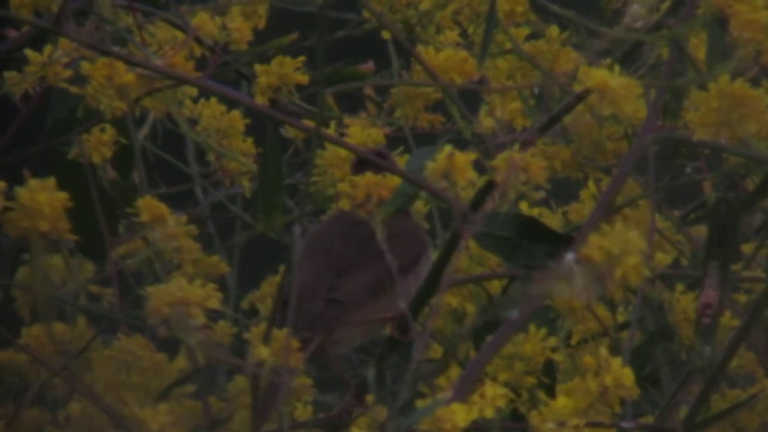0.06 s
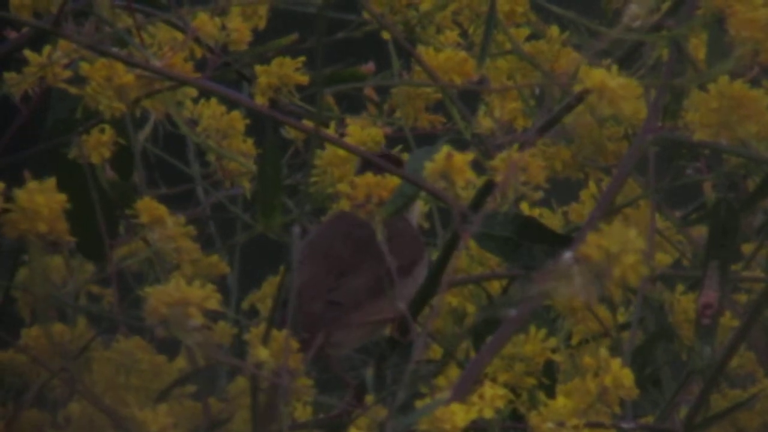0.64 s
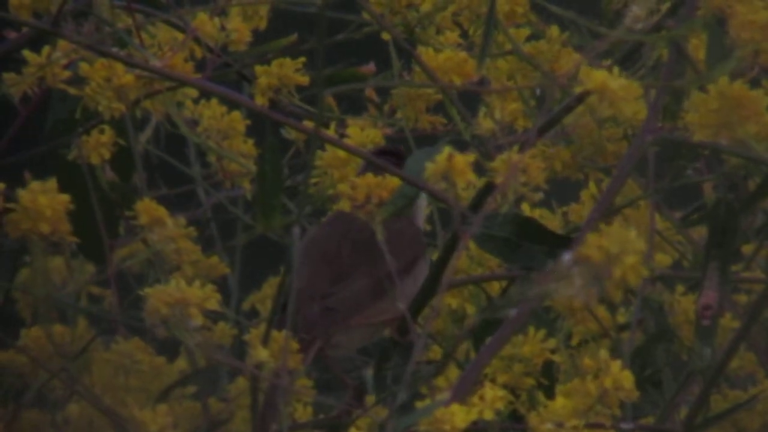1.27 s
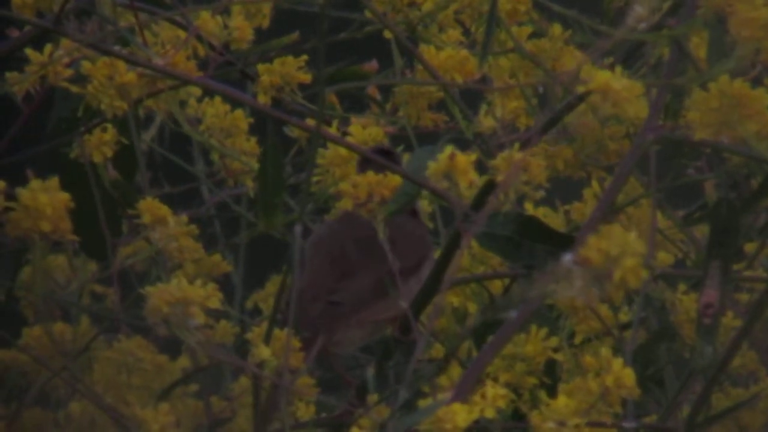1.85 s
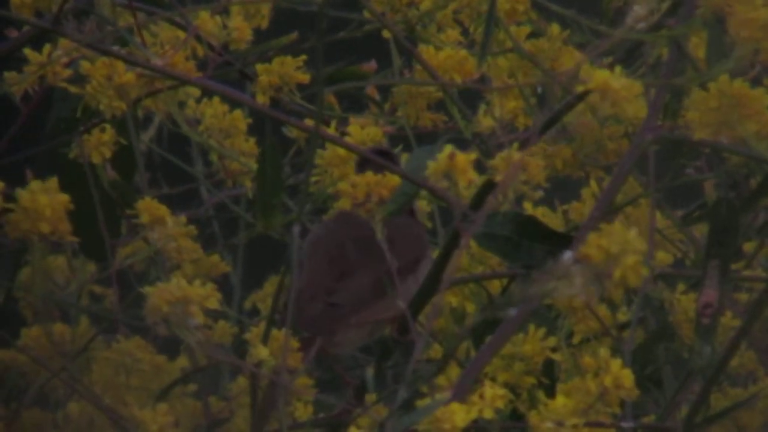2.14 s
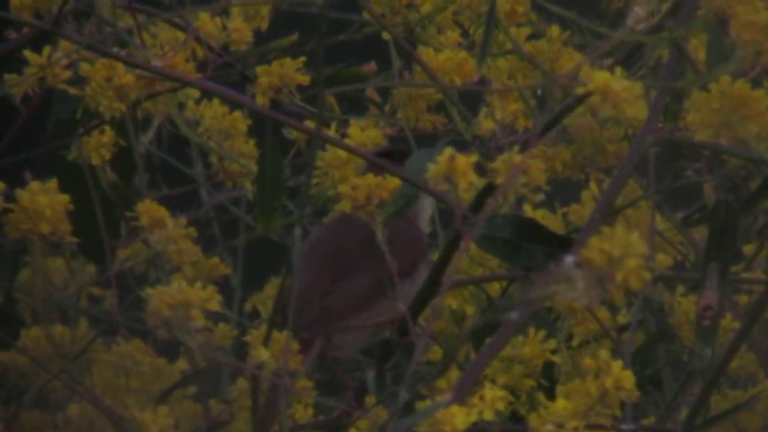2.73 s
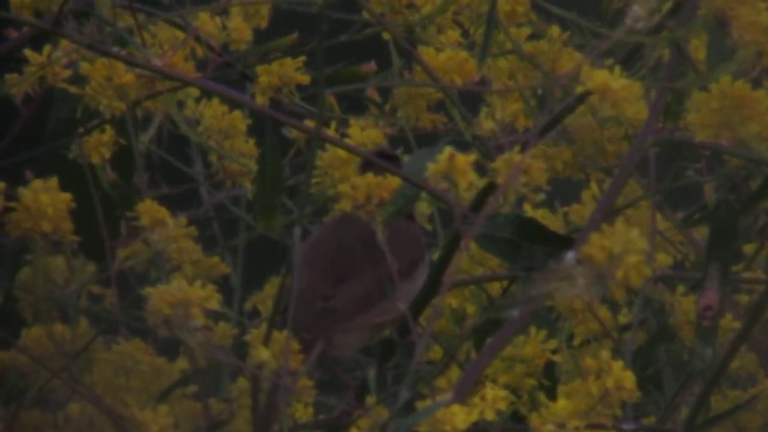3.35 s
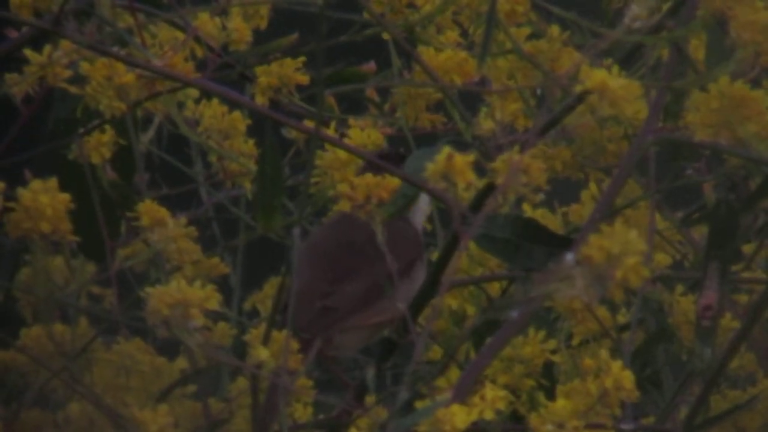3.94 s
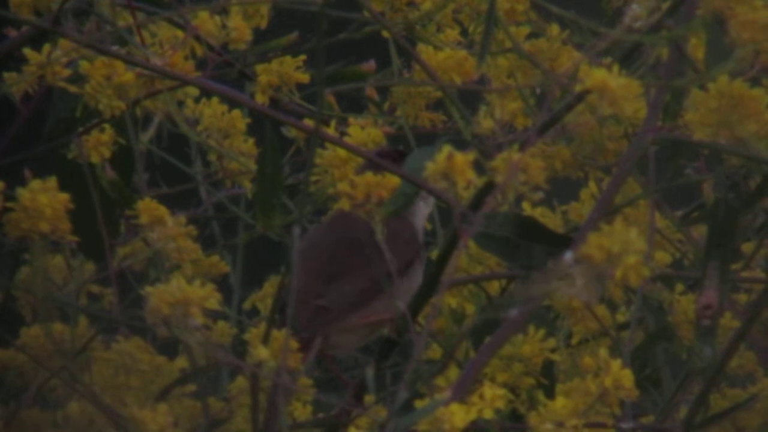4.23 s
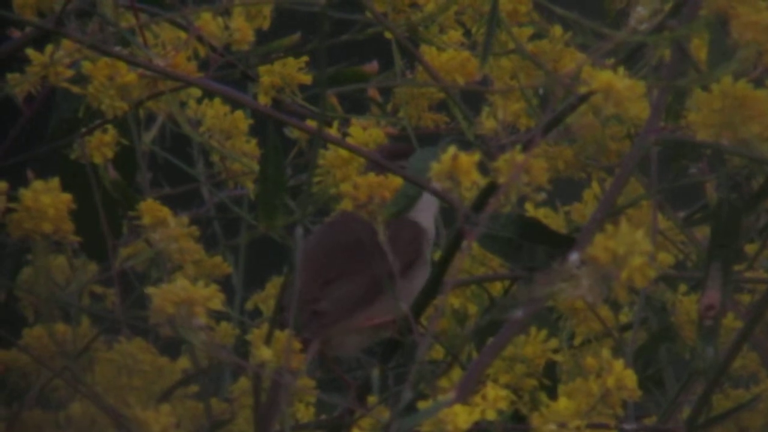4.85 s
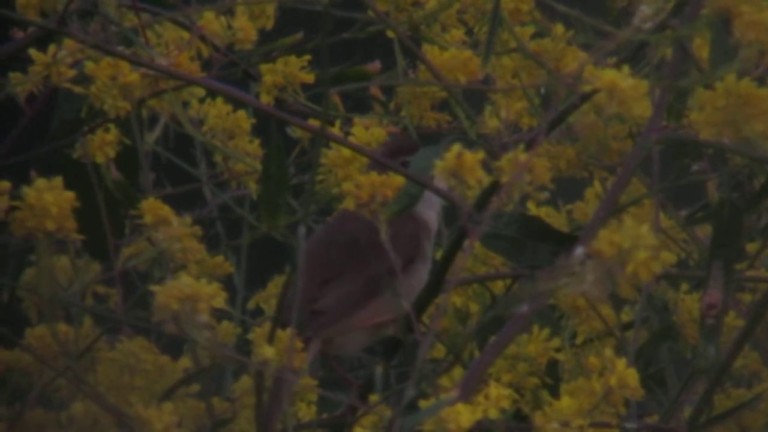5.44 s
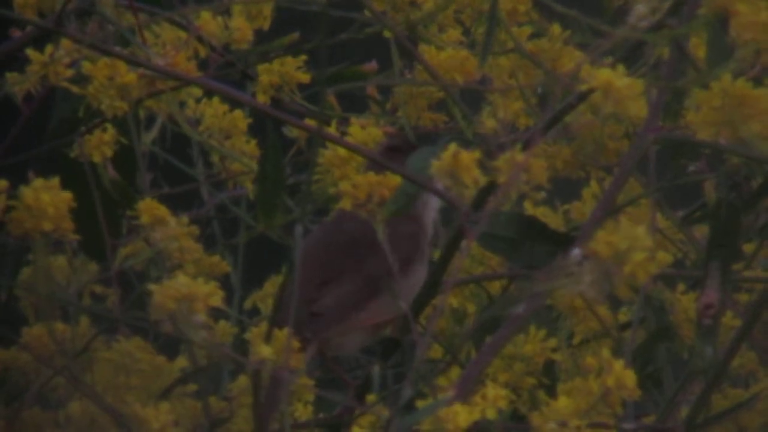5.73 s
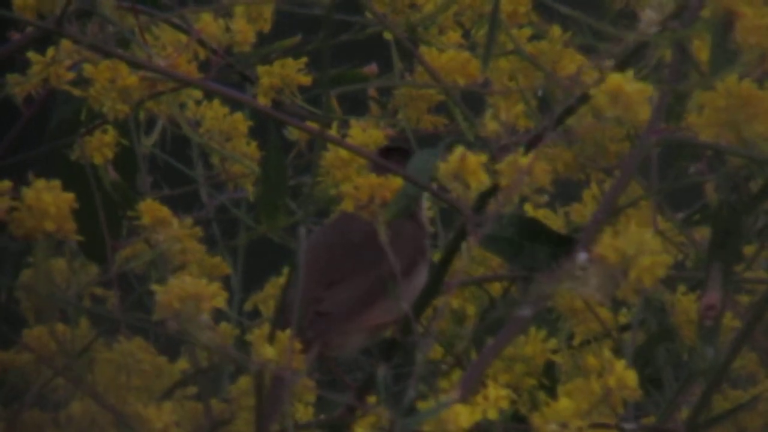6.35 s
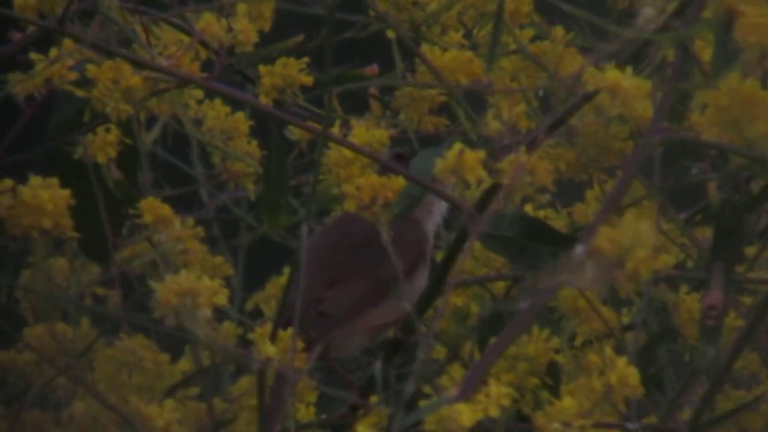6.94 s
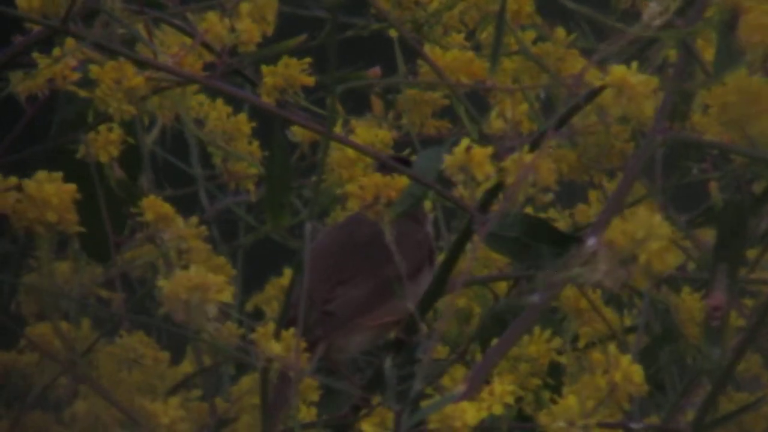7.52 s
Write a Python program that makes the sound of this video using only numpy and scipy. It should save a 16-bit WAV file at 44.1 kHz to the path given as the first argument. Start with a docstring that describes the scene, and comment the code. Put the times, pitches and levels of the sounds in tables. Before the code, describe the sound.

A small warbler sings buzzes, chips and rising whistles outdoors while gusts of wind rumble and thump on the microphone.

```python
"""Warbler in a windy bush

A warbler repeats a phrase of modulated tones: buzz, rising whistle, nasal notes, a chip and quick slurs.
Twigs and ground scatter the song. Turbulent gusts buffet the two microphone ports in turn, and the
leaves rustle once. Behind lie a faint outdoor hush, a distant roar, an insect and the hiss and thin
whine of the camera."""
import sys
import numpy as np
from scipy import signal
from scipy.fft import rfft, irfft, next_fast_len
from scipy.io import wavfile
from scipy.ndimage import map_coordinates

SR = 44100
rng = np.random.default_rng(int(sys.argv[2]) if len(sys.argv) > 2 else 0)


def bounce(signal):
    """Save signal as a 16-bit WAV file at the path given by the first command-line argument."""
    frames = np.transpose(np.atleast_2d(signal))
    limited = np.clip(frames, -1, 1)
    pcm = np.round(limited * 32767).astype(np.int16)
    wavfile.write(sys.argv[1], SR, pcm)


N = 334719

# Bird and background sink in the hardest gusts and slowly return. Each row: time in seconds, gain in dB.
SINK_GAIN = [(0, 0), (.55, -2.5), (1.39, -1), (1.44, -4.5), (1.58, -6), (1.65, -10.5), (1.85, -12.5),
             (2.2, -6), (3.1, .5), (5.26, 0), (5.33, -4.5), (6.6, -0.82)]


def amp(db):
    """Amplitude ratio of a level in decibels."""
    return 10 ** (np.asarray(db) / 20)


def unit(x):
    """Normalisation to rms 1."""
    return x / np.sqrt(np.mean(x ** 2) + 1e-20)


def curve(rows):
    """Linear interpolation of (seconds, value) rows to one value per sample."""
    return np.interp(np.arange(N) / SR, *np.transpose(rows))


def wobble(rate, size=N):
    """Smooth random modulation: a spline through `rate` Gaussian knots a second."""
    knots = rng.standard_normal(int(size * rate / SR) + 4)
    return map_coordinates(knots, [np.arange(size) * rate / SR])


def filtered(x, response):
    """Linear filtering: the spectrum is multiplied by a frequency response."""
    m = next_fast_len(x.shape[-1] + 8192)
    return irfft(rfft(x, m) * response(np.fft.rfftfreq(m, 1 / SR)), m)[..., :x.shape[-1]]


def noise(colour, size=N):
    """Spectral shaping of white noise by (Hz, dB) rows, at rms 1."""
    corner_hz, db = np.transpose(colour)
    response = lambda hz: amp(np.interp(np.log(hz + 1), np.log(corner_hz), db))
    return unit(filtered(rng.standard_normal(size), response))


def wide(colour, shared):
    """Partly coherent stereo noise: a share of its power is common to both sides."""
    common = noise(colour)
    separate = np.array([noise(colour), noise(colour)])
    return np.sqrt(shared) * common + np.sqrt(1 - shared) * separate


def add(track, s, sound):
    """Superposition of a sound on a track, from s seconds."""
    part = track[max(round(s * SR), 0):][:len(sound)]
    part += sound[:len(part)]


def glide(length, pitches, jitter):
    """Progress 0-1 through a note, and its jittered frequency on an arc through evenly spaced pitches."""
    u = np.linspace(0, 1, int(length * SR))
    arc = np.polyfit(np.linspace(0, 1, len(pitches)), pitches, len(pitches) - 1)
    return u, np.polyval(arc, u) * (1 + jitter * wobble(1300, len(u)))


def phase(hz):
    """Phase as the time integral of frequency."""
    return 2 * np.pi * np.cumsum(hz) / SR


def swell(u, rise, fall):
    """Amplitude envelope with quarter-sine ramps over these shares of its length."""
    opening = np.sin(np.pi / 2 * np.clip(u / rise, 0, 1))
    closing = np.sin(np.pi / 2 * np.clip((1 - u) / fall, 0, 1))
    return opening * closing


def hush(db=-49.5):
    """Outdoor hush and camera hiss: nearly steady broadband noise, largely incoherent between sides."""
    # Each row: frequency in Hz, relative spectral density in dB.
    spectrum = [(30, -1), (100, 4.5), (250, 5), (700, 0), (1400, 1), (2400, 5), (3600, -4.5), (5000, -6),
                (7000, -16), (9000, -17), (11500, -15), (15500, -25)]
    return amp(db + 0.24 * wobble(7.6)) * wide(spectrum, shared=0.13)


def distant_roar():
    """A far source, almost coherent at the two ports, grows louder as it draws nearer."""
    # Each row: time in seconds, level in dB.
    approach = [(0, -55.5), (5.9, -59), (6.5, -53), (7.59, -54)]
    # Each row: frequency in Hz, relative spectral density in dB.
    spectrum = [(100, -18.5), (350, -1), (750, 2.5), (1050, -1.5), (1600, -11.5), (3000, -35)]
    return amp(curve(approach) + 0.6 * wobble(3.61)) * wide(spectrum, shared=0.95)


def camera_whine(trim_db=-2):
    """Steady sinusoids form a faint line spectrum in the treble."""
    # Each row: frequency in Hz, level in dB before the trim.
    tones = [(8799, -79.5), (8823, -74.5), (11519, -92)]
    t = np.arange(N) / SR
    return sum(amp(db + trim_db) * np.sin(2 * np.pi * hz * t) for hz, db in tones)


def insect(first_s=.7, period_s=1.004, length_s=0.14, db=-73):
    """Periodic gating of narrow-band noise gives faint high chirps."""
    gate = np.zeros(N)
    for s in np.arange(first_s, N / SR, period_s):
        add(gate, s, swell(np.linspace(0, 1, int(length_s * SR)), rise=.2, fall=.2))
    return amp(db) * gate * noise([(9500, -66), (10600, 0.5), (11100, -1), (12200, -59.5)])


def rustle(grain_db=2):
    """Friction noise: leaves brush together in a gust, with a grainy level."""
    # Each row: start in seconds, length in seconds, level in dB.
    brushes = [(4.91, 0.4067, -46), (5.435, 0.032, -52)]
    # Each row: frequency in Hz, relative spectral density in dB.
    spectrum = [(500, -15), (1500, 3), (2600, 7.5), (4500, 1), (7000, -6.5), (10000, -10), (13000, -12),
                (15500, -29)]
    contact = np.zeros(N)
    for s, length, db in brushes:
        add(contact, s, amp(db) * swell(np.linspace(0, 1, int(length * SR)), rise=.42, fall=.14))
    return contact * amp(grain_db * wobble(300)) * wide(spectrum, shared=0.37)


def ports(db, pan_db):
    """Constant-power panning: left and right gain of a wind that favours one port."""
    return 2 * amp(db) / np.sqrt(1 + amp(np.array([-pan_db, pan_db])) ** 2)


def airflow(edge_db_per_s=500, breeze_db=-60, lull_hardness_db=-2.0):
    """Gusts, puffs and breeze add in power. Gives each port's level and the hardness (extra speed) in dB."""
    # Three long veering gusts. Each row of a gust: time in seconds, strength in dB, left minus right in dB.
    gusts = [
        [(0.0, -33, -17.5), (0.172, -21, -9.5), (0.224, -24, -2.0), (0.272, -25, -7.0), (0.306, -22, -25.5),
         (0.376, -22, -21.5), (0.416, -22, -1.0), (0.694, -23, 10.5), (0.804, -41, -15.5), (0.86, -40, -12.5)],
        [(1.3, -47, -2.5), (1.348, -25, 2.0), (1.384, -16, 18.0), (1.504, -23, 5.0), (1.632, -18, 13.0),
         (1.796, -22, 12.0), (1.844, -31, 6.0), (1.876, -24, 19.0), (2.026, -31, -5.5), (2.084, -28, 5.5),
         (2.166, -33, -15.0), (2.258, -29, 13.5), (2.4, -51, -11.5)],
        [(4.34, -47, 9.0), (4.47, -26, -17.0), (4.554, -20, -25), (4.592, -32, -15.0), (4.632, -26, -16.0),
         (4.704, -19, 15.5), (4.974, -29, 2.5), (5.112, -21, 16.5), (5.146, -27, 5.0), (5.196, -25, 16.0),
         (5.258, -20.5, 2.5), (5.292, -16, 14.0), (5.334, -26, 16.0), (5.388, -23, 16.5), (5.47, -19, -4.5),
         (5.526, -19.5, 3.5), (5.72, -55.5, -10.5)],
    ]
    # Extra speed makes a gust sputter. Each row: hardness in dB at its start, middle and end.
    gust_hardness = [(-1.11, -0.76, -1.5), (-1.61, 2, -1.2113), (-0.3, 0.19, 2)]
    # Each row: start in seconds, length in seconds, strength in dB, left minus right in dB.
    puffs = [(0.879, .06, -31, -22), (1.109, 0.073, -41, 14), (1.199, .1, -44, -4), (2.571, 0.1013, -30, 7),
             (2.679, .06, -43, 0), (3.06, 0.048, -48, -12), (3.281, .26, -41, 3), (3.53, 0.2, -32, -12),
             (3.689, 0.26, -44, 9), (4.22, 0.094, -45, 14), (5.957, 0.126, -48, 15),
             (7.017, 0.056, -47.5, 11), (7.172, 0.062, -47, 5)]
    t = np.arange(N) / SR
    power, hardness_db = np.zeros((2, N)), np.full(N, lull_hardness_db)
    for rows, hard_db in zip(gusts, gust_hardness):
        s, db, pan_db = np.transpose(rows)
        outside_s = np.abs(t - np.clip(t, s[0], s[-1]))
        power += ports(np.interp(t, s, db) - edge_db_per_s * outside_s, np.interp(t, s, pan_db)) ** 2
        blowing_db = np.interp(t, np.linspace(s[0], s[-1], 3), hard_db)
        hardness_db = np.where(outside_s > 0, hardness_db, blowing_db)
    for s, length, db, pan_db in puffs:
        shape = swell(np.linspace(0, 1, int(length * SR)), rise=.25, fall=.4)
        for port, gain in zip(power, ports(db, pan_db)):
            add(port, s, (gain * shape) ** 2)
    return 10 * np.log10(power + amp(breeze_db) ** 2), hardness_db


def buffet(level_db, hardness_db, brightening=.29, lump_db=1.13, burst_db=3.0, burst_speed=.6):
    """Frozen turbulence: eddies drift past a port, so a faster wind is brighter as well as louder."""
    # Turbulence at the reference speed. Each row: frequency in Hz, relative spectral density in dB.
    eddies = [(20, -22), (50, -9.5), (100, 0), (200, 2), (350, -3.5), (550, -12.5), (800, -27.5),
              (1200, -43.5), (2000, -63), (4000, -78), (8000, -120)]
    burst = burst_db * wobble(260)
    speed = amp(brightening * (level_db - curve(SINK_GAIN) + 20) + hardness_db + burst_speed * burst)
    travel = np.cumsum(speed)
    pressure = map_coordinates(noise(eddies, size=2 * N), [travel], order=3, mode="wrap")
    calm = 1 / (1 + amp(2 * (-65.5 - level_db)))  # the lightest air makes no eddies
    return amp(level_db) * calm * unit(pressure * amp(burst + lump_db * wobble(45)))


def thumps(width_ms=0.51, trim_db=1):
    """A tight eddy hits a port: one pressure pulse of either sign between two opposite lobes."""
    # Each row: time in seconds, peak in dB before the trim, left minus right in dB.
    hits = [(.319, -3, -32), (.385, -6.5, -18), (.508, -11.5, 24), (.635, -7, 22), (.243, -11, -7),
            (1.346, -21, 3), (1.38, -9, 29), (1.447, -1, 23), (1.587, -7, 20), (1.615, -3.5, 21),
            (1.867, -7.5, 22.5), (1.914, -9, 32), (4.541, -5, -31.5), (4.72, -1, 34), (4.992, -7.5, 20),
            (5.272, -0.5, 18), (5.354, -11, 30), (5.483, -8, 5)]
    out = np.zeros((2, N))
    ms = np.arange(-SR // 200, SR // 200) * 1000 / SR
    for s, db, pan_db in hits:
        u = ms / (width_ms * amp(rng.normal(0, 2.07)))
        push = rng.choice([-1, 1]) * (1 - u ** 2) * np.exp(-u ** 2 / 2)
        for port, side_db in zip(out, [min(pan_db, 0), min(-pan_db, 0)]):
            add(port, s - .003, amp(db + side_db + trim_db) * push)
    return out


def bush(song, scatter_db=-10, t60=0.09, lag_ms=0.037):
    """Direct sound reaches the right port first; scattering by twigs and ground adds a short echo."""
    t = np.arange(SR // 4) / SR
    tails = rng.standard_normal((2, len(t))) * amp(-60 * t / t60) * (t > .001)
    tails /= np.linalg.norm(tails, axis=1, keepdims=True)
    direct = filtered(song, lambda hz: np.exp(1j * np.pi * hz * lag_ms / 1000 * np.array([[-1], [1]])))
    scattered = signal.fftconvolve(song[None], tails, axes=1)[:, :N]
    return direct * amp([[-.7], [.7]]) + amp(scatter_db) * scattered


def buzzes(pulse_hz=385, rough=0.14):
    """Amplitude modulation chops a falling harmonic note into fast, uneven pulses."""
    # Each row: start in seconds, length in seconds, level in dB, nominal fundamental in Hz.
    notes = [(1.099, .09, -45.5, 1510), (2.008, .09, -50, 1500), (2.696, 0.118, -50, 1380),
             (3.392, .11, -49, 1414), (4.151, 0.102, -50.5, 1470), (4.98, 0.1, -51.5, 1430),
             (5.76, 0.11, -47, 1370), (6.59, 0.12, -48, 1452), (7.176, 0.12, -49.5, 1460)]
    # Each row: harmonic number, relative level in dB.
    partials = [(2, -2), (3, 4), (4, -7)]
    # Pitch ratios at the start, middle and end.
    droop = [1.13, 0.96, .945]
    out = np.zeros(N)
    for s, length, db, pitch_hz in notes:
        u, hz = glide(length, pitch_hz * np.array(droop), jitter=.03)
        rate = pulse_hz * (1 + 0.0405 * rng.normal() + rough * wobble(250, len(u)))
        pulses = np.exp(np.cos(phase(rate)))
        voice = sum(amp(level) * np.sin(k * phase(hz)) for k, level in partials)
        envelope = amp(db + 1.9 * wobble(339, len(u))) * swell(u, rise=0.094, fall=0.49)
        add(out, s, envelope * unit(pulses * voice))
    return out


def reed(hz, throat_hz, width):
    """Source and filter: harmonics 2 to 6 weighted by one throat resonance, at rms 1."""
    k = np.arange(2, 7)[:, None]
    throat = 1 / (1 + (np.log(k * hz / throat_hz) / width) ** 2)
    harmonics = np.sin(k * phase(hz) + rng.uniform(0, 2 * np.pi, k.shape))
    return unit(np.sum(throat * harmonics, axis=0))


def chips(throat_width=0.213, bend=1.8, trim_db=-3):
    """Reedy upward flicks that level off; frequency jitter makes them scratchy."""
    # Each row: start and length in seconds, level in dB before the trim, start and end pitch in Hz,
    # throat resonance in Hz, jitter as a share of the pitch.
    notes = [(0.019, 0.029, -46.5, 1400, 1590, 4870, .09), (0.273, 0.077, -45, 970, 2200, 4680, 0.021),
             (0.417, .033, -41, 1060, 2220, 4830, .03), (1.226, .026, -45.5, 1450, 1620, 5000, .06),
             (2.432, .021, -45.5, 1300, 1760, 5540, .04), (3.85, .024, -45.5, 780, 1340, 4050, 0.0326),
             (4.683, 0.02, -49, 1506, 1920, 6360, 0.063), (5.443, .031, -50.5, 674.5, 1219, 3780, 0.038),
             (6.291, 0.015, -39.5, 1457, 1830, 5260, 0.039), (7.058, 0.0232, -45, 1020, 1620, 4980, 0.059),
             (7.317, 0.024, -46, 1300, 1560, 4953, 0.096)]
    out = np.zeros(N)
    for s, length, db, start_hz, end_hz, throat_hz, jitter in notes:
        middle_hz = end_hz - (end_hz - start_hz) * .5 ** bend
        u, hz = glide(length, [start_hz, middle_hz, end_hz], jitter)
        voice = reed(hz, throat_hz, throat_width)
        add(out, s, amp(db + trim_db) * swell(u, rise=0.277, fall=0.24) * voice)
    return out


def nasals(length_s=0.0355, slowing_s=.004, throat_hz=2650, opening_hz=139.96, trim_db=-3):
    """Low reedy notes in slowing groups; the formant rises from note to note as the throat opens."""
    # Each row: start in seconds, number of notes, first spacing in seconds, level in dB before the trim,
    # nominal fundamental in Hz.
    groups = [(2.292, 2, 0.0618, -42, 853), (3.01, 3, 0.059, -44.5, 854), (3.71, 2, 0.06, -45, 850.8),
              (4.475, 3, 0.054, -46, 866), (5.314, 2, 0.047, -45.5, 835), (6.081, 3, 0.0588, -44, 827),
              (6.917, 2, 0.064, -45.5, 850)]
    # Pitch ratios at the start, middle and end.
    bend = [.83, 0.96, 1.016]
    out = np.zeros(N)
    for s, notes, spacing, db, pitch_hz in groups:
        for k in range(notes):
            arch = np.array(bend) * (1 + .012 * rng.standard_normal(3))
            u, hz = glide(length_s, pitch_hz * arch, jitter=.018)
            voice = reed(hz, throat_hz + k * opening_hz, width=0.15)
            onset = s + k * spacing + k * (k - 1) * slowing_s
            add(out, onset, amp(db + trim_db) * swell(u, rise=0.46, fall=0.16) * voice)
    return out


def trills(trill_hz=108, trim_db=-1):
    """Frequency modulation swings the pitch raggedly about a rising glide while the note swells."""
    # Each row: start and length in seconds, final level before trim and fade in dB, crescendo in dB,
    # swing in Hz, then start, middle and end pitch in Hz.
    notes = [(0.59, 0.1154, -38, 15.5, 420, 3900, 4200, 5560),
             (0.702, 0.0314, -38.5, 2, 600, 4500, 4650, 4880), (1.471, .14, -36, 15, 330, 4300, 4470, 5760),
             (1.606, 0.0327, -40.5, 3, 300, 3700, 4670, 5134)]
    out = np.zeros(N)
    for s, length, db, crescendo_db, swing_hz, *pitches in notes:
        u, hz = glide(length, pitches, jitter=.055)
        swing = swing_hz * np.sin(phase(trill_hz * (1 + 0.15 * wobble(90, len(u)))))
        level_db = db + trim_db - crescendo_db * (1 - u) + 2.0 * wobble(360, len(u))
        add(out, s, amp(level_db) * swell(u, rise=0.13, fall=0.28) * np.sin(phase(hz + swing)))
    return out


def sung(figure, times):
    """Repetition of a figure's notes, shifted in time and level by each (seconds, dB) row."""
    return [(s + delay, length, db + note_db, *pitches)
            for s, db in times for delay, length, note_db, *pitches in figure]


def slurs(trim_db=-2):
    """Quick frequency sweeps of a pure tone, alone or in two kinds of figure."""
    # Each row: start and length in seconds, relative level in dB, then start, middle and end pitch in Hz.
    # In a figure, starts count from its first note.
    singles = [(0.384, 0.018, -41, 5960, 5100, 3540), (0.399, 0.021, -48, 6500, 5610, 5300),
               (3.23, 0.009, -41.5, 6850, 5310, 3600)]
    zigzag = [(0, 0.0102, -5, 3800, 2980, 2450), (.026, .013, 0.5, 2050, 2710, 3100),
              (.055, .022, -0.5, 5800, 3400, 2300)]
    flourish = [(0, 0.0086, -9.5, 7220, 5900, 4600), (.083, .035, 0, 2210, 3020, 2600),
                (.148, .018, -8, 2800, 2280, 2050), (.171, 0.011, -5.5, 2190, 3310, 2500),
                (.192, .02, -8.5, 3700, 4900, 4500), (.212, 0.013, -2, 3000, 2700, 2380)]
    # When each figure is sung. Each row: start in seconds, gain in dB.
    zigzag_times = [(2.547, -36.5), (3.237, -37.5), (3.973, -36.5), (4.824, -41.5), (5.587, -38.5),
                    (6.441, -44)]
    flourish_times = [(.786, -34.5), (1.69, -40.5)]
    out = np.zeros(N)
    for s, length, db, *pitches in singles + sung(zigzag, zigzag_times) + sung(flourish, flourish_times):
        u, hz = glide(length, pitches, jitter=0.024)
        envelope = amp(db + trim_db + 0.9 * wobble(200, len(u))) * swell(u, rise=0.49, fall=0.16)
        add(out, s, envelope * np.sin(phase(hz)))
    return out


def whistles(peak_share=0.611, fade_db=15, flutter_db=2.5, trim_db=-2):
    """A pure tone settles on its held pitch, then climbs in a quadratic sweep, flutters and thins out."""
    # Each row: start and length in seconds, peak level before the trim in dB, crescendo in dB,
    # opening, held and top pitch in Hz, share of the note before the climb.
    notes = [(2.132, .096, -34.5, 4.5, 4450, 4390, 6700, 0.22),
             (2.852, .095, -32.5, 6.5, 4380, 4390, 6850, 0.17),
             (3.548, 0.11, -36, 0, 4530, 4440, 6950, 0.27),
             (4.301, 0.095, -34, 4.5, 4920, 4574, 6700, 0.26),
             (5.14, 0.0865, -32, 12, 4556, 4470, 6200, 0.244),
             (5.908, .092, -29, 3.5, 4420, 4440, 6450, 0.28),
             (6.744, 0.094, -29.5, 4.5, 4490, 4500, 6440, .3)]
    out = np.zeros(N)
    for s, length, db, crescendo_db, opening_hz, held_hz, top_hz, knee in notes:
        u = np.linspace(0, 1, int(length * SR))
        settle = np.maximum(1 - u / knee, 0)
        climb = np.maximum(u - knee, 0) / (1 - knee)
        hz = held_hz + (opening_hz - held_hz) * settle ** 2 + (top_hz - held_hz) * climb ** 2
        hz *= 1 + .003 * wobble(1300, len(u)) + 0.015 * u * wobble(135, len(u))  # wavers as it climbs
        shape_db = np.interp(u, [knee, peak_share, 1], [-crescendo_db, 0, -fade_db])
        shape_db += flutter_db * wobble(152, len(u))
        add(out, s, amp(db + trim_db + shape_db) * swell(u, rise=0.11, fall=0.092) * np.sin(phase(hz)))
    return out


def scene():
    """Superposition of the bird in its bush, the background and the wind at both ports."""
    song = whistles() + slurs() + trills() + nasals() + chips() + buzzes()
    levels_db, hardness_db = airflow()
    wind = np.array([buffet(level_db, hardness_db) for level_db in levels_db]) + thumps()
    bird = bush(song)
    background = hush() + distant_roar() + insect() + camera_whine()
    return amp(curve(SINK_GAIN)) * (bird + background) + wind + rustle()


def record(dry, notch_hz=8200, notch_width_hz=480, top_hz=15750):
    """Soft saturation in the camera rounds off peaks; a deep treble notch and a steep band limit follow."""
    notch = lambda hz: 1 - .98 * np.exp(-((hz - notch_hz) / notch_width_hz) ** 4)
    rounded = dry / (1 + dry ** 4) ** .25
    return filtered(rounded, lambda hz: notch(hz) * (hz < top_hz))


dry = scene()
out = record(dry)
bounce(out)
```